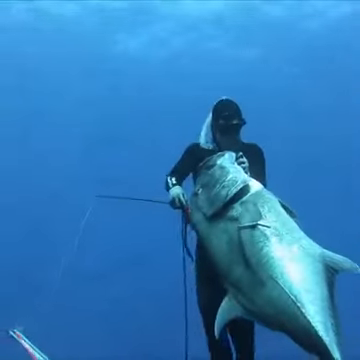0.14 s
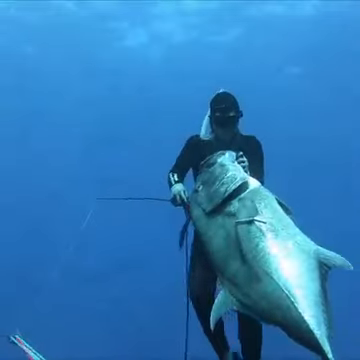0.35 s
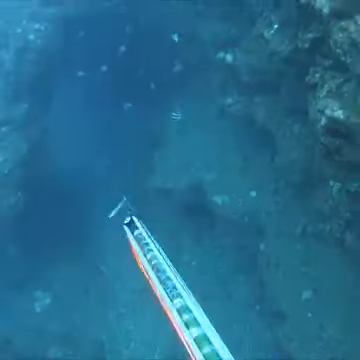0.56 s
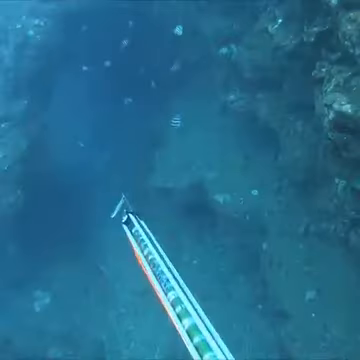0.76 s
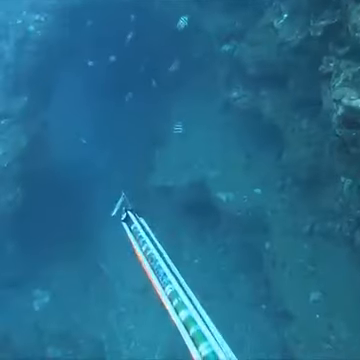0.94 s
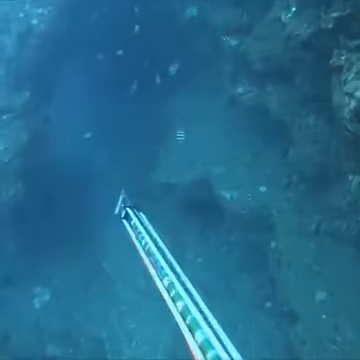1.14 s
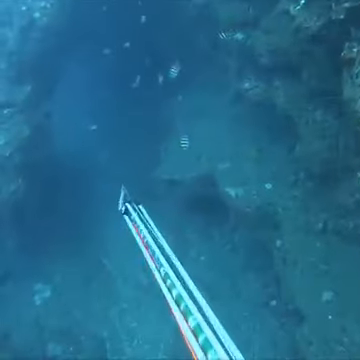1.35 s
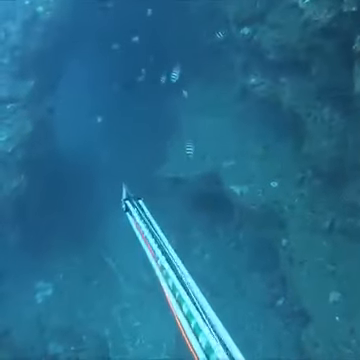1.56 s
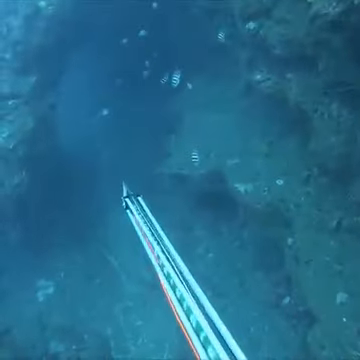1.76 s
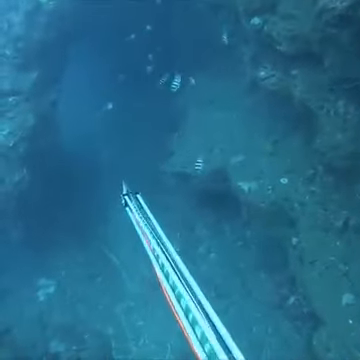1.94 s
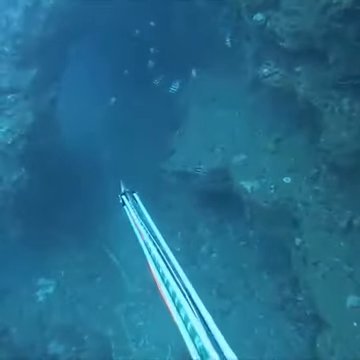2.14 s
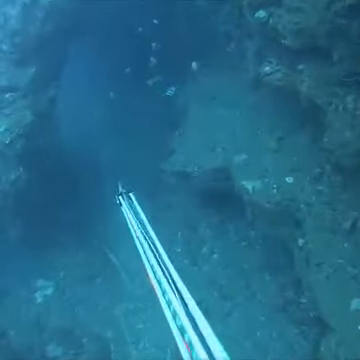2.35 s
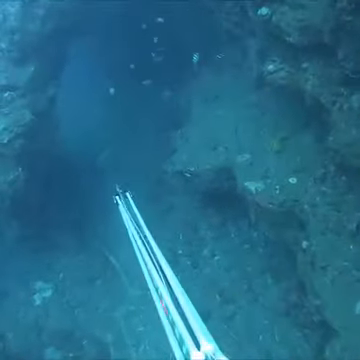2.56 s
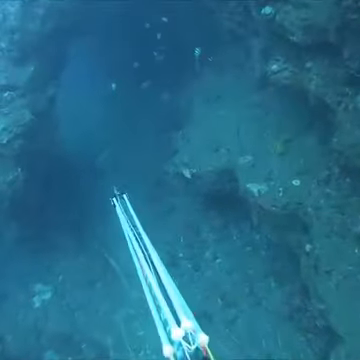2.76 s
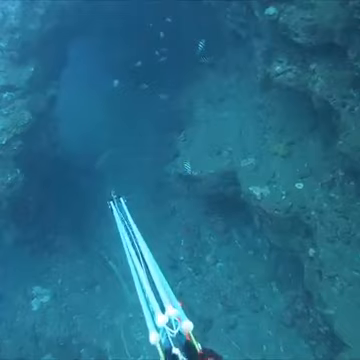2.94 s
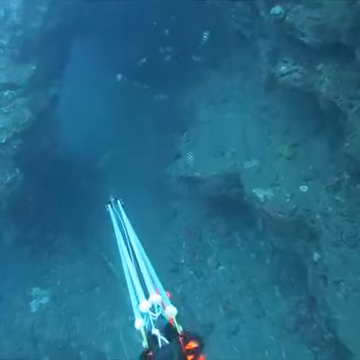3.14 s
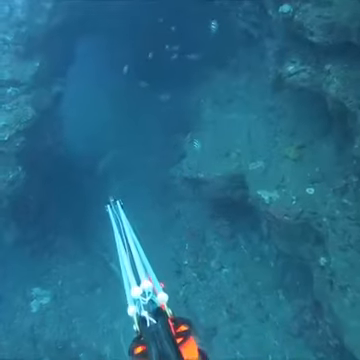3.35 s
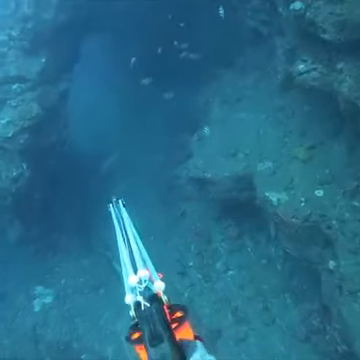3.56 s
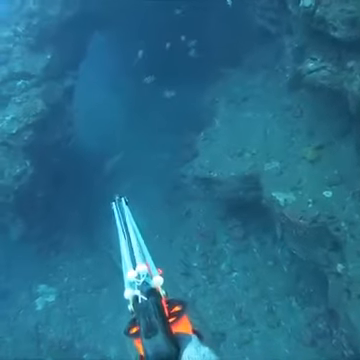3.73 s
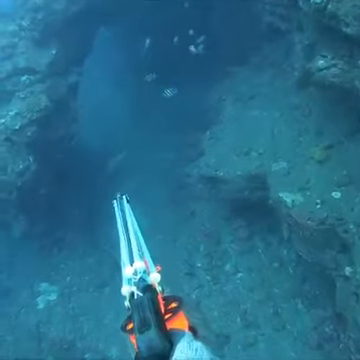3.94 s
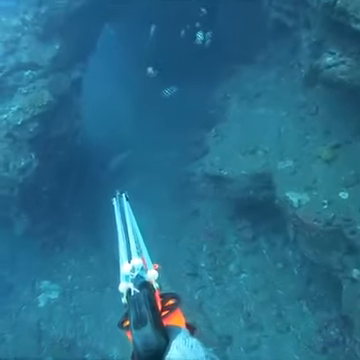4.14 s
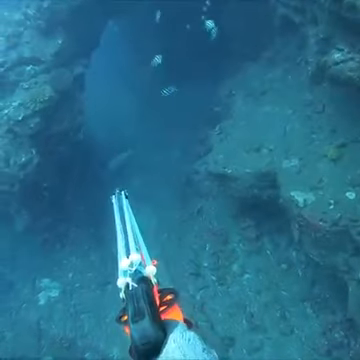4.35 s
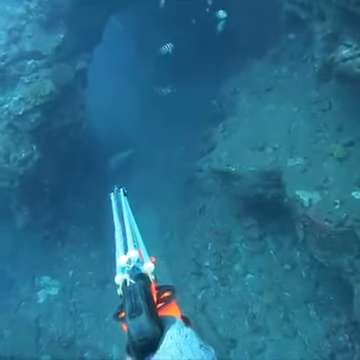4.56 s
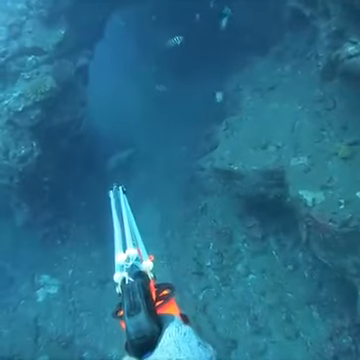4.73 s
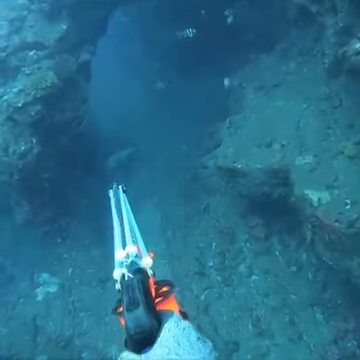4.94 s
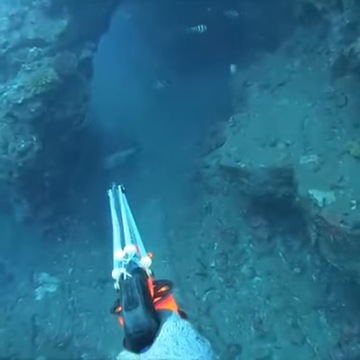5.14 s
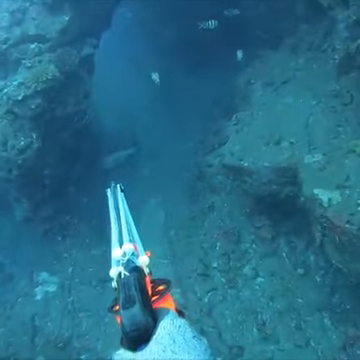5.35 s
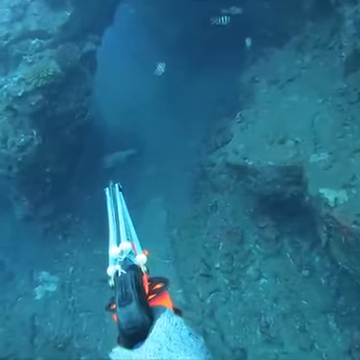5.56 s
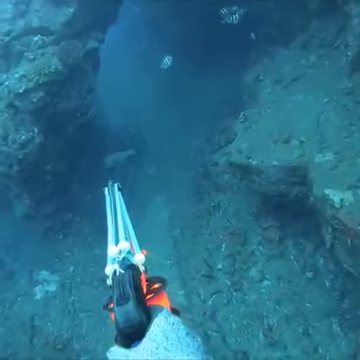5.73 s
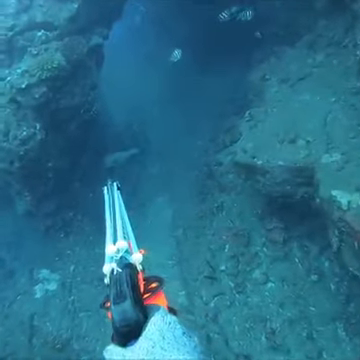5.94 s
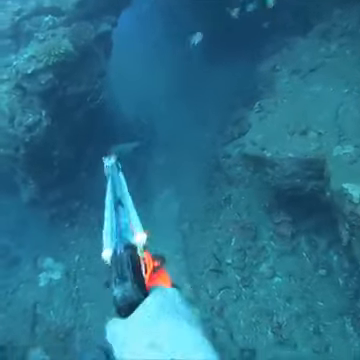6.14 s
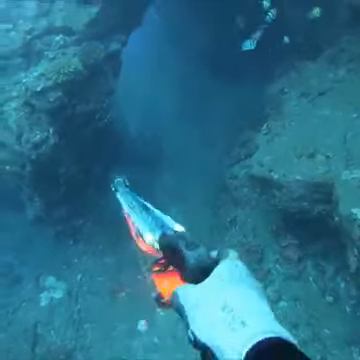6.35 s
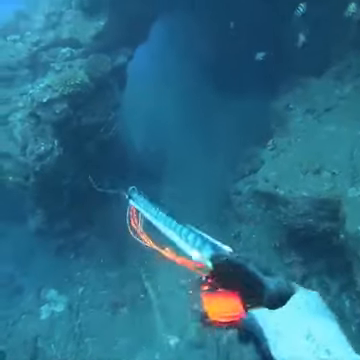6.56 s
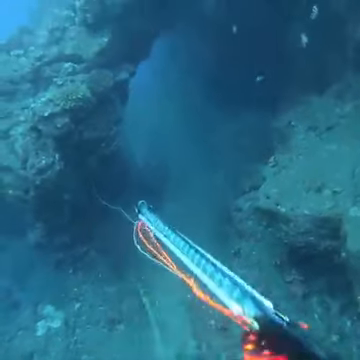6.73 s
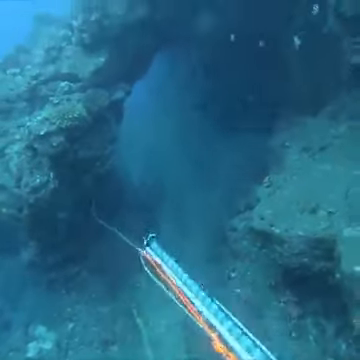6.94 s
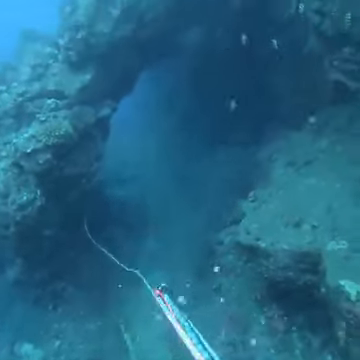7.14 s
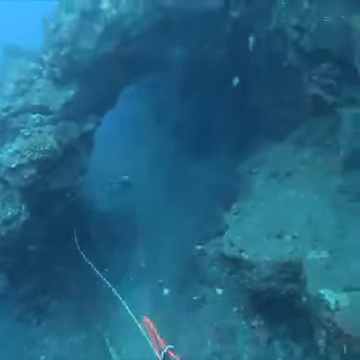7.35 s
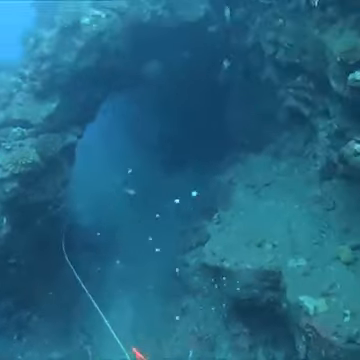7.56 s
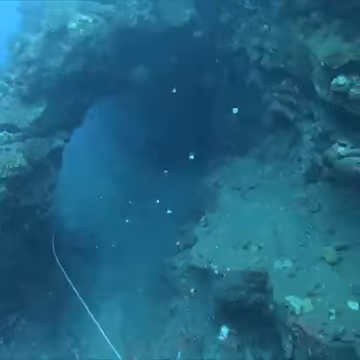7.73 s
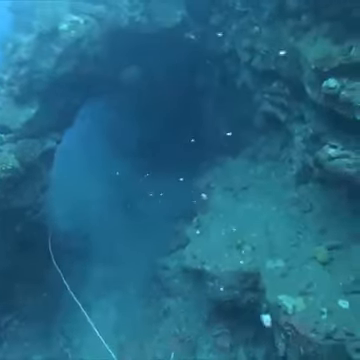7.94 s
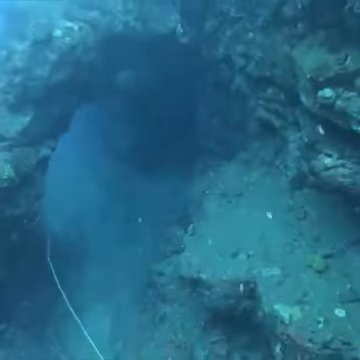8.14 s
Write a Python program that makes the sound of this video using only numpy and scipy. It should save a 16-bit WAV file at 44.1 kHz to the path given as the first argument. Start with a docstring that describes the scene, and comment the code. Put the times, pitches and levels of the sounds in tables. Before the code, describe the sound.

Underwater close-up from a hard camera case with two microphones, muffled and resonant. From 0 to 0.6 s, fine reef crackle, gear rubbing and small ticks, with a firmer clack near 0.4. Silence falls at about 0.65-0.78 s. Sound returns mono and faint: shrimp crackle, soft bumps around 1.25, small clicks near 2.8. From 3.3 to 3.8 it widens; a dull bump hits at 3.95, a metallic tick at 4.35. Clacks cluster from 5.26 to 5.55, strongest around 5.46. At 6.18 the speargun fires with a very loud, sharp crack and trigger ring, a second blow with shaft hiss at 6.245, and deep thuds dying by 6.4. A quieter lull follows, then rubbing swells from 6.7, with a scraping knock at 7.04. From 7.1 to the end at 8.3, short wavering pings around 1.7 kHz gurgle among ticks, water rumble and low thuds near 7.95.

```python
"""A speargun fires under water by a reef: trigger and barrel ring, the shaft hisses and deep thuds follow.
Afterwards something on the line pings. Two microphones in a hard camera case also hear gear rubbing,
ticking and bumping close by, water moving round the case, and shrimp crackling on the reef.
After a short early silence the sound is mono, then widens. Noise and blows drive damped resonances of the
case; pings, thuds and bumps are decaying tones."""
import sys
import numpy as np
from scipy import signal
from scipy.fft import rfft, irfft, next_fast_len
from scipy.io import wavfile
from scipy.ndimage import uniform_filter1d

SR = 44100
rng = np.random.default_rng(int(sys.argv[2]) if len(sys.argv) > 2 else 0)


def wav_out(sig):
    """Save sig, one row per channel (or a flat mono array), as 16-bit PCM at SR to the path in sys.argv[1]."""
    wavfile.write(sys.argv[1], SR, np.round(np.clip(np.atleast_2d(sig).T, -1, 1) * 32767).astype(np.int16))


N = 365588
T = np.arange(N) / SR

# share of two-microphone sound against mono: t/s, share/0-1
WIDTH = [(0, 0.65), (.7, 0.7), (.71, 0), (3.05, 0), (3.3, 0.01), (3.8, 0.54)]
# bumps on the case: t/s, relative level/dB, f/Hz, t60/s
BUMPS = [(.331, -45, 164, .15), (0.429, -39, 153, .06), (1.228, -42, 220, .08), (1.246, -32, 255, .05),
         (1.266, -31, 210, .05), (1.272, -30, 220, .04), (1.315, -44, 200, .06), (1.387, -41, 217, .043),
         (2.822, -25, 240, .018), (2.8365, -19, 190, .02), (3.9528, -9.5, 185, .03), (3.934, -33, 170, .06),
         (3.9535, -23, 330, .03), (4.349, -34, 217, .1), (4.481, -34, 179, .07), (4.508, -38, 170, .1),
         (4.53, -43, 183, .15), (4.786, -44, 254, .058), (5.449, -30, 380, .02), (5.465, -29, 380, .02),
         (5.468, -36, 121, .045), (5.5035, -33, 380, .02), (6.176, -17, 110, .04), (6.243, -19, 215, .047),
         (6.3, -31, 200, .1), (6.3385, -22, 195, .04), (6.3442, -15, 195, .06), (6.357, -18, 150, .045),
         (6.373, -28, 130, .07), (6.392, -30, 110, .1), (6.41, -36, 150, .08), (6.52, -42, 200, .1),
         (6.545, -40, 130, .08), (6.752, -34, 163, .045), (7.058, -19.5, 194, .048), (7.1, -39, 121, .054),
         (7.206, -32.5, 188, .063), (7.549, -39, 143, .064), (7.605, -30.5, 193, .061),
         (7.64, -30, 191, .067), (7.8, -38, 125, .12), (8.0, -34, 130, .12), (8.15, -37, 140, .12)]
# water moving round the case: t/s, relative flow level/dB, relative surge level/dB
WATER = [(0, -62, -60.5), (.15, -65, -62), (.5, -56, -67), (.62, -66, -73), (.76, -75, -78),
         (1.04, -76, -81), (1.27, -68, -79), (1.45, -73, -84), (1.75, -73, -73), (2.45, -71.5, -74),
         (3.0, -62, -67), (3.37, -73, -71), (4.3, -66, -69.5), (4.92, -78, -81), (5.43, -62.5, -62),
         (5.6, -78, -77), (6.0, -82, -76), (6.14, -74, -66), (6.42, -68, -54), (6.6, -64, -63),
         (6.8, -59, -69), (7.09, -61, -52), (7.22, -60, -66), (7.5, -56.5, -52), (7.8, -62.5, -57),
         (8.0, -58, -48.5), (8.29, -56, -60.5)]


def amp(db):
    """Decibels to gain."""
    return 10 ** (np.asarray(db) / 20)


def evened(x):
    """Scales to rms 1."""
    return x / np.sqrt(np.mean(x ** 2) + 1e-20)


def curve(rows, order):
    """One column of a table, interpolated at every sample."""
    rows = np.array(rows)
    return np.interp(T, rows[:, 0], rows[:, order])


def add(mix, s, sound):
    """Mixes a sound in at time s."""
    part = mix[..., round(s * SR):][..., :sound.shape[-1]]
    part += sound[..., :part.shape[-1]]


def flicker(seconds):
    """Smoothed noise of rms 1, wandering over about the given time."""
    size = int(seconds * SR)
    smooth = uniform_filter1d(rng.standard_normal(N), size)
    return evened(uniform_filter1d(smooth, size))


def hiss(patchy_db, seconds):
    """Two independent noises whose common level flickers."""
    return amp(patchy_db * flicker(seconds)) * rng.standard_normal((2, N))


def struck(blows, modes):
    """Each blow rings damped modes, every mode a little stronger or weaker at random."""
    out = np.zeros((2, N))
    t = np.arange(4000) / SR
    hz, db, t60, lead = np.transpose(modes)[:, :, None]
    lucks = rng.standard_normal((len(blows), len(modes), 1))
    turn = 2 * np.pi * hz * t
    right_turn = turn + lead * np.minimum(t * hz, 1)  # the lead builds over the first cycle
    for (s, blow_db), luck in zip(blows, lucks):
        size = (1 - np.exp(-t / .0004)) * amp(blow_db + db + 2.5 * luck - 60 * t / t60)
        left = (size * np.sin(turn)).sum(0)
        right = (size * np.sin(right_turn)).sum(0)
        add(out, s, -np.array([left, right]))
    return out


def gun_blows():
    """The release snaps open and rings the trigger; single blows ring the barrel."""
    # the release snapping open, and single blows on the gun: t/s, relative level/dB
    release = [(6.1795, -17), (6.1808, -17), (6.1825, -18), (6.1842, -21), (6.191, -32), (6.197, -34)]
    blows = [(4.3482, -28), (4.3505, -28), (4.352, -31), (6.2452, -30)]
    # modes of trigger and barrel: f/Hz, relative level/dB, t60/s, right leads/rad
    trigger = [(1500, -4, .015, 2.2), (1950, 0, .02, .3), (2360, -4, .02, .3), (3130, -3, .02, .8),
               (4520, -8, .015, .8), (4740, -1, .016, 1.6), (5380, 0, .012, 1.8), (5800, -8, .012, 1.6)]
    barrel = [(850, -9, .06, .8), (1372, -6, .03, 1.5), (1570, -3, .065, 2.2), (1778, 0, .06, 1.5),
              (2242, -3, .06, .3), (2412, -8, .035, .3), (2850, 4, .015, .6), (3248, 0, .018, .8),
              (3500, -1, .028, .8), (4300, -12, .025, .8), (4490, -12, .035, .8), (6400, -16, .02, 1.2),
              (6950, -14, .015, 1.2)]
    return struck(release, trigger) + struck(blows, barrel)


def slide(order, apart_db):
    """Rough hiss of gear dragging, the release, the sliding shaft and jerks of the line.

    order: 0 track, 1 cavity, 2 ports, 3 mesh; apart_db favours the right microphone's own drive."""
    # t of peak/s, relative level/dB, time to rise 20 dB/s (negative: only falls), time to fall 20 dB/s,
    # cavity above that level/dB, ports above that level/dB
    scrapes = [(1.262, -55, .03, .07, 8, -15), (1.41, -55, .04, .05, 3, -13),
               (6.1808, -16, .0045, .004, -12, 0), (6.241, -18, .033, .012, -9, -24),
               (6.271, -36, .5, .008, -11, -6), (6.29, -56, -0.8, .4, -3, -15),
               (6.352, -36, .011, .019, -4.5, -17), (7.037, -30, 0.0064, .04, -8.5, -15),
               (7.162, -48, .03, .03, -6, -25), (7.362, -47, .03, .03, -9, -25),
               (8.005, -49, .03, .04, -9, -15)]
    mesh_db = -5  # against the ports
    run_up_s = .096  # no scrape builds for longer
    level = np.zeros(N)
    t = np.arange(-run_up_s, .5, 1 / SR)
    for s, db, rise, fall, low, high in scrapes:
        above = (0, low, high, high + mesh_db)[order]
        add(level, s - run_up_s, amp(db + above + 20 * np.minimum(t / rise, -t / fall)))
    return level * hiss(2.0, 0.00069) * amp([[-apart_db], [apart_db]])


def knocks(table, rise_turns, overtone_db):
    """Damped low swings with a soft start and a quicker overtone, alike in both ears."""
    out = np.zeros(N)
    t = np.arange(SR // 3) / SR
    for s, db, hz, t60 in table:
        start = 1 - np.exp(-t * hz / rise_turns)
        turn = 2 * np.pi * hz * t
        overtone = amp(overtone_db - 45 * t / t60) * np.sin(1.68 * turn)
        add(out, s, -amp(db - 60 * t / t60) * start * (np.sin(turn) + overtone))
    return out


def thuds():
    """Deep damped swings of recoil and tugs, a shade louder on the right."""
    # t/s, relative level/dB, f/Hz, t60/s
    thud_rows = [(2.84, -41, 60, 0.084), (3.97, -31.5, 45, 0.11), (6.182, -6, 59, 0.13),
                 (6.2468, -5, 64, 0.1), (6.275, -11, 39, 0.14), (6.298, -14, 62, 0.13),
                 (6.316, -17, 60, 0.11), (6.4, -37, 45, .15), (6.46, -38, 42, .15), (6.54, -38, 40, .2),
                 (5.47, -38, 59.8, 0.11), (7.36, -29.5, 41, 0.13), (7.56, -33.5, 45.9, 0.23),
                 (7.926, -30, 36, 0.4), (7.953, -21.5, 35, 0.17), (7.981, -22, 35, 0.16)]
    return knocks(thud_rows, rise_turns=0.17, overtone_db=-15) * amp([[-.2], [.2]])


def pings():
    """Short tones of a small resonator swell, waver and die; weak ones gurgle between them.

    The left microphone hears them louder and later."""
    # t/s, relative level/dB, f/Hz, length/s
    ping_rows = [(6.454, -47, 1660, .012), (7.117, -40, 1690, .009), (7.183, -43, 1650, .01),
                 (7.247, -36.5, 1690, .01), (7.158, -42, 2450, .014), (7.246, -40, 2050, .009),
                 (7.35, -41, 2550, .02), (7.456, -40, 2450, .01), (7.834, -41, 2400, .018),
                 (7.271, -41, 1650, .01), (7.311, -38.5, 1680, .015), (7.3395, -32, 1670, .012),
                 (7.38, -32.5, 1690, .016), (7.415, -34, 1710, .007), (7.433, -31, 1660, .013),
                 (7.461, -37, 1680, .015), (7.5208, -30, 1670, .014), (7.553, -37, 1680, .013),
                 (7.6067, -40, 1660, .01), (7.626, -42, 1680, .009), (7.718, -43, 1700, .01),
                 (7.746, -41, 1570, .01), (7.8055, -28, 1650, .011), (7.834, -40, 1670, .012),
                 (7.866, -38, 1620, .017), (7.924, -34, 1690, .014), (8.047, -36, 1640, .009),
                 (8.061, -35, 1650, .007), (8.07, -30.5, 1630, .011), (8.145, -29, 1670, .014),
                 (8.21, -41, 1610, .01), (8.25, -44, 1560, .01)]
    gurgle_from_s, gurgle_to_s, per_s = 7.06, 8.27, 70
    weak_db, weak_spread_db = -51, 3.5
    weak_hz, weak_hz_spread, weak_s = 1900, .25, .006  # the pitch spread is a fraction
    out = np.zeros((2, N))
    t = np.arange(2000) / SR
    gaps = -np.log(rng.random(200)) / per_s
    size, tune = rng.standard_normal((2, 200))
    weak = [(s, weak_db + weak_spread_db * a, weak_hz * (1 + weak_hz_spread * b), weak_s)
            for s, a, b in zip(gurgle_from_s + np.cumsum(gaps), size, tune) if s < gurgle_to_s]
    noise = rng.standard_normal((len(ping_rows) + 200, 2, len(t)))
    chance = evened(uniform_filter1d(uniform_filter1d(noise, 110), 110))
    for (s, db, hz, length), (waver, bend) in zip(ping_rows + weak, chance):
        u = t / length
        swell = (1 - np.exp(-6.0 * u)) * np.exp(-1.6 * u ** 3)
        phase = 0.5 * bend + np.array([[0], [1.4]])
        tone = swell * np.sin(2 * np.pi * hz * t + phase)
        add(out, s, amp(db + 2.4 * waver + np.array([[5.5], [2.6]])) * tone)
    return out


def jolts():
    """Sharp clacks push both microphones: an inward pulse between two weaker outward lobes."""
    # t/s, peak level/dB
    jolt_rows = [(.3831, -21), (.849, -41), (1.2505, -36), (1.391, -42), (1.4075, -43), (1.4165, -42),
                 (1.435, -45), (4.349, -27), (5.2611, -27), (5.2852, -24), (5.309, -29), (5.3778, -29),
                 (5.392, -33), (5.4208, -29), (5.4492, -14), (5.4652, -12.5), (5.5038, -15), (5.5453, -31),
                 (5.5483, -26), (6.025, -34), (6.1803, -2), (6.2388, -13), (6.2455, -4.5), (6.27, -18),
                 (6.3106, -31), (7.0356, -27), (7.848, -36), (7.924, -30), (8.252, -36)]
    pulse_hz = 2600
    out = np.zeros(N)
    u = (np.pi * pulse_hz * np.arange(-40, 41) / SR) ** 2
    for s, db in jolt_rows:
        add(out, s - 36 / SR, -amp(db) * (1 - 1.15 * u) * np.exp(-u))
    return out


def bumps():
    """Damped low swings of bumps on the case."""
    return knocks(BUMPS, rise_turns=0.35, overtone_db=-20.0)


def grit(boost_db, seconds):
    """Every bump drags a little: rough noise that builds just before it and dies after it."""
    level = np.zeros(N)
    t = np.arange(4000) / SR
    shape = t / seconds * np.exp(1 - t / seconds)
    for s, db, *_ in BUMPS:
        add(level, s - seconds, amp(db + boost_db) * shape)
    return level * hiss(3.35, 0.0018)


def strikes():
    """Gear ticks and shrimp snaps as rows: s, dB in the walls, dB above that in cavity, ports and mesh."""
    # ticks of the gear: t/s, relative level in the walls/dB, cavity above that/dB, ports above that/dB
    gear_ticks = [(.0479, -37, -15, -14), (.1131, -36, -16, -9), (.068, -42, -15, 2), (.118, -37, -14, -6),
                  (.165, -36, -8, -12), (.175, -39, -8, -12), (.209, -36, -13, 0), (.2594, -21.5, -24, -6),
                  (0.2714, -29, -20, -9), (.293, -38, -15, -10), (.34, -39, -12, -8), (.363, -36, -10, -10),
                  (.382, -23, -3, -17), (.391, -34, -12, -2), (.434, -35, -30, -4),
                  (0.4474, -32.5, -25, -5.5), (.459, -35, -15.5, -9), (.484, -36, -20, -10),
                  (.8175, -40.5, -20, -7), (.848, -46, -1, -16), (.873, -41, -14, -24),
                  (1.2498, -46.5, 9.5, -21), (1.305, -33, -24, -5.5), (1.3903, -51, 7, -12),
                  (1.4047, -46, 3.5, -20), (2.7664, -28.5, -26, -10), (2.8073, -37, 9, -25),
                  (2.8105, -43, 11, -25), (2.753, -42, -20, -8), (2.79, -41, -25, -10),
                  (3.01, -31.5, -27, -5.5), (3.4897, -39.5, -27, -2), (3.9235, -40, -19, -8.5),
                  (3.9382, -30.5, -25, -5.5), (4.095, -43, -28, -2), (4.1128, -26.5, -40, -8),
                  (4.3478, -28, -12, -12), (4.4168, -31.5, -29, 0), (4.4403, -36, -28, -4),
                  (5.2596, -31, -9, -12), (5.2838, -32, -9, -12.5), (5.3066, -34, -11, -17),
                  (5.345, -38.5, 2, -10), (5.362, -44, 5, -15), (5.3762, -34.5, -6.5, -13),
                  (5.4196, -36, -10, -8), (5.4478, -30, 2, -5), (5.4638, -30, 2, -5), (5.5017, -31, 1, -6),
                  (5.5458, -33, -7, -10), (5.6124, -29, -5, -11), (5.632, -46, 5, -15),
                  (5.7917, -40, -15, -5), (6.007, -40, -25, -8), (6.0149, -34, -25, -2),
                  (6.024, -36, -10, -6), (6.1787, -13, -24, -7), (6.2427, -18.5, -5, -26),
                  (6.214, -27, -14, -14), (6.2335, -23, -14, -16), (6.2385, -21, -14, -18),
                  (6.2688, -22, -11, -13), (6.3095, -32, -8, -21), (6.339, -29, -8, -20),
                  (6.3854, -37, -16, -13), (6.599, -38.5, -10, -15), (6.8668, -35.5, -19, -30),
                  (6.8966, -36.5, -8, -14), (6.985, -38.5, -8, -17), (7.0345, -21, -30, -24),
                  (7.0823, -32, -5.5, -26), (7.168, -42, 0, -25), (7.2465, -38, -1, -31),
                  (7.3118, -45, 10, -25), (7.416, -39, 1, -25), (7.434, -44, 5, -25), (7.455, -38, -5, -25),
                  (7.502, -38, -6, -25), (7.5216, -45, 5, -28), (7.604, -35, -19, -19),
                  (7.673, -30, -34, -6), (7.6945, -29.5, -23, -6.5), (7.724, -46, 6, -25),
                  (7.744, -35, -12, -7), (7.8065, -32, -2, -24), (7.83, -43, 2, -25),
                  (7.9225, -27, -14, -9), (7.929, -38, 3, -25), (8.0494, -36, -7, -10),
                  (8.0805, -28, -19, 3.5), (8.126, -33, -25, -10), (8.1465, -34, -3, -8),
                  (8.165, -42, 0, -20), (8.213, -37, -8, -15)]
    # the loudest shrimp snaps: t/s, relative level in the ports/dB, mesh above that/dB
    snaps = [(1.0926, -40.5, -30), (1.4962, -47.5, 6.5), (1.6946, -47, 1), (1.922, -35, -1.5),
             (1.9664, -45, 8.5), (2.428, -40, -18), (2.557, -42, -3), (2.864, -55.5, 16),
             (2.9455, -44, 7.5), (3.4481, -36.5, -8), (3.772, -40, -.5), (4.386, -41, -12),
             (4.7331, -40, -3.5), (4.9345, -39.5, 0.5), (5.179, -40, 4), (5.187, -31.5, -2.5),
             (5.7518, -33, 0), (5.7742, -34, -7), (6.111, -41, -6), (6.576, -49.5, -5), (8.0334, -37, -23)]
    mesh_db, mesh_slope = -14.5, 0.91  # for ticks, the mesh follows the ports
    walls_db, cavity_db = -8, -18  # for snaps: walls against ports, cavity against walls
    gear = [(s, db, low, high, mesh_db + mesh_slope * high) for s, db, low, high in gear_ticks]
    reef = [(s, db + walls_db, cavity_db, -walls_db, top - walls_db) for s, db, top in snaps]
    return gear + reef


def ticks(order, boost_db, scratch_s, late_s):
    """Each tick or snap is a sharp blow and a dying scratch; order: 0 walls, 2 cavity, 3 ports, 4 mesh."""
    out = np.zeros((2, N))
    t = np.arange(600) / SR
    rows = strikes()
    scratch = 0.25 * rng.standard_normal((len(rows), 2, len(t))) * np.exp(-t / scratch_s)
    scratch[:, 0, 0] = -1  # the shared blow always pushes the same way
    scratch[:, 1, 0] = np.sign(scratch[:, 1, 0])
    for row, burst in zip(rows, scratch):
        above = row[order] if order else 0
        add(out, row[0] + late_s, amp(row[1] + above + boost_db) * burst)
    return out


def rubbing_level():
    """Flickering gain of the gear rubbing on the case."""
    # t/s, relative level/dB
    rub_rows = [(0, -60.5), (.15, -57), (.45, -57.5), (.62, -64), (.76, -68), (.88, -62), (1.0, -70.5),
                (1.27, -59), (1.56, -66.5), (1.86, -62), (2.3, -67), (2.9, -59.5), (3.4, -67.5),
                (3.93, -64.5), (4.0, -61), (4.22, -56), (4.3, -61), (4.52, -56), (4.62, -62.5), (4.78, -55),
                (5.15, -69.5), (5.33, -56), (5.6, -61.5), (6.07, -70.5), (6.42, -68), (6.5, -70.5),
                (6.72, -52), (6.98, -65.5), (7.1, -59), (7.25, -52), (7.46, -51), (7.64, -52),
                (7.78, -50.5), (8.0, -56), (8.29, -53)]
    return amp(curve(rub_rows, order=1) + 2.0 * flicker(.05))


def rub_in_cavity(rubbing, rustle, shrimp):
    """Patchy noise and fine snaps, both following the rubbing gear."""
    return rubbing * amp(3.0) * rustle * (0.82 * hiss(1.94, 0.0076) + 0.25 * coloured(shrimp))


def rub_and_reef_in_walls(rubbing, reef, rustle, shrimp):
    """Rubbing and reef add as powers to drive the walls."""
    both = np.hypot(rubbing * amp(-5), reef * amp(-2.5))
    return both * amp(2.0) * rustle * (0.52 * hiss(3.15, 0.016) + 0.45 * coloured(shrimp))


def flow():
    """Patchy noise of water flowing past the case."""
    return amp(curve(WATER, order=1) + 2.0) * hiss(4.2, 0.024)


def surge():
    """Lumpy rumble of water pushing the case, alike in both ears."""
    band = signal.butter(3, [16, 62], "bandpass", fs=SR, output="sos")
    rumble = evened(signal.sosfilt(band, rng.standard_normal(N)))
    return amp(curve(WATER, order=2) + 3.0) * amp(3.8 * flicker(0.052)) * rumble


def reef_level():
    """Flickering gain of the reef's crackle."""
    # t/s, relative level/dB
    crackle_rows = [(0, -58.5), (.45, -58.5), (.62, -61), (.76, -76.5), (1.0, -68.5), (1.6, -65.5),
                    (2.3, -62), (3.3, -63.5), (4.09, -60), (4.78, -57.5), (5.02, -60), (5.4, -57.5),
                    (6.14, -55), (6.28, -66), (6.42, -75), (6.52, -68), (6.95, -66), (7.46, -63),
                    (7.64, -55.5), (8.29, -56.5)]
    return amp(curve(crackle_rows, order=1) + 1.5 * flicker(.05))


def crackle(per_s, spread_db):
    """Sizes of random snaps, many small and a few large."""
    sizes = amp(spread_db * np.minimum(rng.exponential(1, N), 5))
    return evened(sizes * (rng.random(N) < per_s / SR))


def coloured(snaps):
    """The same snaps reach each region of the case with a strength of their own."""
    return snaps * rng.standard_normal((2, N))


def reef_in_ports(reef, rustle, shrimp):
    """Crackle and its patchy haze drive the ports."""
    return reef * amp(3.0) * rustle * (0.45 * hiss(3.37, 0.023) + 0.6 * coloured(shrimp))


def reef_in_mesh(reef, rustle, shrimp):
    """Treble of the crackle, with a second swarm of snaps; it is duller where the sound is wide."""
    # changing level of the treble: t/s, relative level/dB
    treble = [(0, -1), (.7, -1), (.9, -6), (1.12, -3), (1.7, -.5), (3.3, 1), (3.8, 2), (4.2, -1), (5.2, 0),
              (6.2, 0), (6.6, -1), (7.2, 1), (7.7, -1), (8.29, 3)]
    mono_db, wide_db = -4, -13.5
    bright = amp(mono_db + (wide_db - mono_db) * curve(WIDTH, order=1) + curve(treble, order=1))
    swarm = crackle(per_s=480, spread_db=6.0)
    snaps = coloured(0.3 * shrimp + 0.12 * swarm)
    return reef * bright * amp(4.5) * rustle * (0.67 * hiss(2.1, 0.012) + snaps)


def rings(modes, soft):
    """Impulse responses: mono, left, right from the shared drive, right from its own drive."""
    hz, width, mono_db, left_db, right_db, lead, same = np.transpose(modes)[:, :, None]
    t = np.arange(4096) / SR
    sign = (-1.) ** np.arange(len(modes))[:, None]  # neighbours of opposite sign leave no hole between them
    start = 1 - np.exp(-soft * width * t)  # a soft start steepens the flanks of each resonance
    ring = sign * width * start * np.exp((2j * hz - width) * np.pi * t)
    same = np.clip(same, 0, 1)
    right = amp(right_db) * (ring * np.exp(1j * lead * np.minimum(t * hz, 1))).imag
    mono = (amp(mono_db) * ring.imag).sum(0)
    left = (amp(left_db) * ring.imag).sum(0)
    shared = (same * right).sum(0)
    own = (np.sqrt(1 - same ** 2) * right).sum(0)
    middle = np.hypot(np.linalg.norm(left + shared), np.linalg.norm(own)) / 2
    return mono / np.linalg.norm(mono), left / middle, shared / middle, own / middle


def case(drive, modes, soft=6.5):
    """Two drives (shared, right only) ring the case; mono and two-microphone sound are blended."""
    size = next_fast_len(N + 4096)
    mono, left, shared, own = rfft(np.array(rings(modes, soft)), size)
    a, b = rfft(drive, size)
    mono, *pair = irfft(np.array([a * mono, a * left, a * shared + b * own]), size)[:, :N]
    wide = np.clip(curve(WIDTH, order=1), 0, 1)
    return np.sqrt(wide) * np.array(pair) + np.sqrt(1 - wide) * mono * (1 - 0.32 * wide)


def scene():
    """Shaft, gear, water and shrimp drive the regions of the case; blows, knocks and pings add on."""
    # resonances of the case by region, then of the track the shaft hisses in:
    # f/Hz, width/Hz, relative mono, left and right levels/dB, right leads/rad, likeness of the ears/0-1
    shell = [(136, 49, -10.5, -4, -5.5, -0.16, 0.92), (179.4, 46, -4.5, 6, 7, 0.59, 0.94),
             (222.2, 18.7, -1, 4.5, -10.5, -1.1, 0.6), (277, 210, -14, -8, -7, -0.66, 0.7)]
    cavity = [(673.4, 114, 2.5, -17, 2, 0.72, 0.7), (785, 136.5, -4.5, -12.5, 5, 0.87, 0.63),
              (1164, 420, -13.5, -23.5, -5.5, 2.8, 0.13)]
    walls = [(1377, 210, -18.5, -5.5, -2, 1.26, 0.63), (1626, 185, -7, 6.5, -9, 2.6, 0.64),
             (1974, 240, -6, -0.5, 4.5, 0.09, 0.81), (2425, 387, -4, 3, 2.5, 0.25, 0.69)]
    ports = [(2973, 476, 10, -13.5, -3, 0.75, 0.6), (3300, 380, 4.5, 0, 1, 1, 0.32),
             (4077, 940, 9.5, -28, -9.5, 1, 0.17), (4890, 170, -28.5, -11.5, 1.5, -1.5, 0.36),
             (5290, 490, -16, 2.5, 3.5, 2.5, 0.25), (6010, 590, -7, -0.5, 6, 1.13, 1),
             (6660, 180, 0.5, 7, -19, 3.5, .4)]
    mesh = [(7615, 580, -2, -3.5, 2, 0.43, 0.75), (8320, 130, -2.5, 6.5, -9.5, 0.12, .5),
            (9070, 1400, -11, -11.5, 2.5, 0.15, 0.47), (10200, 810, -14, -1, -4, 0.26, 0.79),
            (11070, 730, -12.5, -11.5, -8, 0.15, 0.44), (13200, 2000, -23.5, -14, -16, 0.064, .5)]
    track = [(1460, 290, -1.5, 0, -20, 2, 0.98), (1715, 40, 0, 4, -4, 1, .9), (1905, 50, 0, 0, 2, .3, .8),
             (1980, 342, 2, -2, 1, 0.32, 0.7), (1965, 50, 0, 2, 4, .3, .9), (2042, 50, 0, 3, 5, .3, .9),
             (2165, 60, 0, 2, 4, .3, .8), (2450, 550, 2.5, -14, -17, 0.14, .9),
             (4730, 250, -25, -13, -10, .3, .8), (5400, 200, -25, -11, -9, .3, .8)]

    shrimp = crackle(per_s=450, spread_db=3.2)
    rustle = amp(1.8 * flicker(.012))
    rubbing, reef = rubbing_level(), reef_level()

    in_shell = flow() + amp(-11) * slide(order=1, apart_db=-3.5) + grit(boost_db=-27.0, seconds=0.0095)
    in_cavity = (rub_in_cavity(rubbing, rustle, shrimp) + grit(boost_db=-39.0, seconds=0.0077)
                 + slide(order=1, apart_db=2.1))
    cavity_ticks = ticks(order=2, boost_db=17.0, scratch_s=0.0012, late_s=0.0001)
    in_walls = (rub_and_reef_in_walls(rubbing, reef, rustle, shrimp)
                + ticks(order=0, boost_db=7.0, scratch_s=0.0011, late_s=0.000796))
    in_ports = (reef_in_ports(reef, rustle, shrimp) + slide(order=2, apart_db=6.5)
                + ticks(order=3, boost_db=8.0, scratch_s=0.0025, late_s=.0009))
    in_mesh = (reef_in_mesh(reef, rustle, shrimp) + slide(order=3, apart_db=4.0)
               + ticks(order=4, boost_db=8.5, scratch_s=0.0026, late_s=0.0013))

    direct = gun_blows() + thuds() + pings() + jolts() + bumps() + surge()
    low = case(in_shell, shell) + case(in_cavity, cavity) + case(cavity_ticks, cavity, soft=12.0)
    middle = case(in_walls, walls) + case(slide(order=0, apart_db=1.1), track)
    high = case(in_ports, ports) + case(in_mesh, mesh)
    return direct + low + middle + high


def first_hold(x):
    """Before the silence ends the case is held another way and sounds fuller."""
    # f/Hz, gain/dB
    colour = [(60, -4), (150, 1), (350, 0), (520, -2), (700, -5), (950, 2), (1250, -5), (1600, 2),
              (2050, -2), (2800, 3), (3600, 0), (4400, 3), (5800, -2), (8000, -1), (12000, 1)]
    end = round(.7 * SR)  # inside the silence
    hz, db = np.transpose(colour)
    gain = amp(np.interp(np.log(np.fft.rfftfreq(end, 1 / SR) + 1), np.log(hz), db))
    return np.hstack([irfft(rfft(x[:, :end]) * gain, end), x[:, end:]])


def record(dry):
    """The first colour, a drop of the top treble, the short silence and the band limit."""
    # level round the silence: t/s, gain/dB
    silence = [(.603, 5.5), (.612, -17.5), (.635, -28.5), (.66, -76), (.752, -70), (.78, -19), (.81, 0)]
    shelf_hz, edge_hz = 14150, 16300
    dry = first_hold(dry)
    shelf = signal.firwin(511, shelf_hz, window=("kaiser", 8), fs=SR)
    dull = signal.oaconvolve(dry, shelf[None], "same")
    out = (dull + amp(-15) * (dry - dull)) * amp(curve(silence, order=1))
    edge = signal.firwin(511, edge_hz, window=("kaiser", 9), fs=SR)
    return signal.oaconvolve(out, edge[None], "same")


dry = scene()
out = record(dry)
wav_out(out)
```